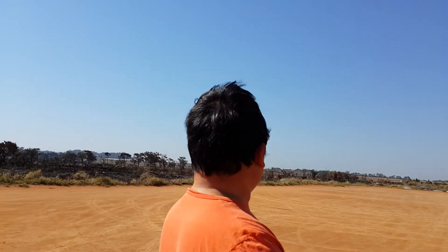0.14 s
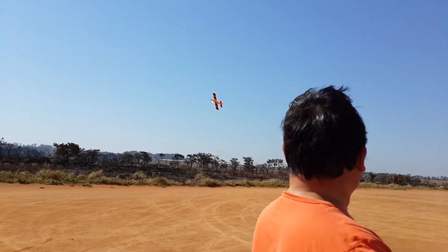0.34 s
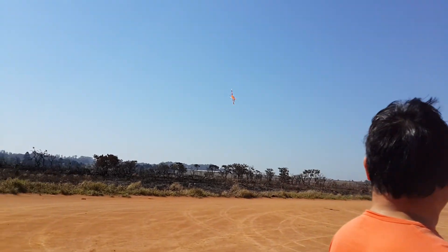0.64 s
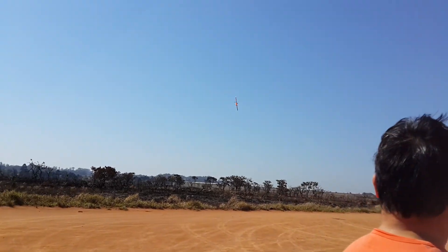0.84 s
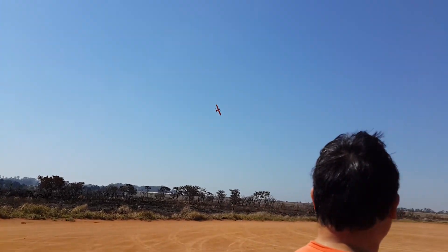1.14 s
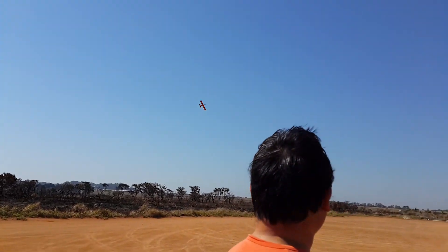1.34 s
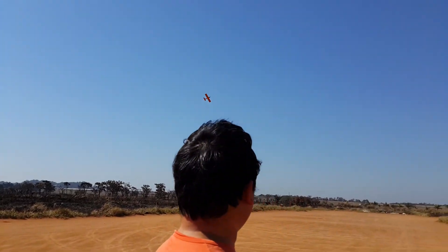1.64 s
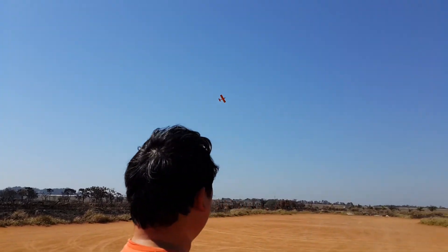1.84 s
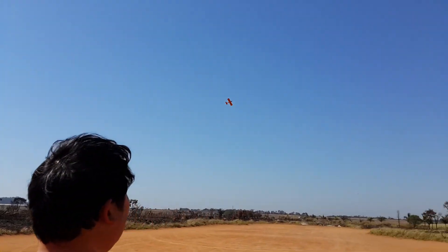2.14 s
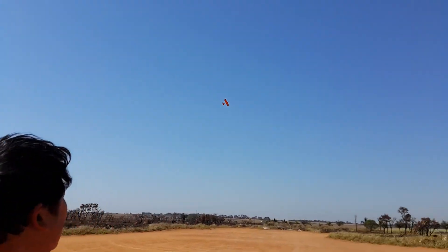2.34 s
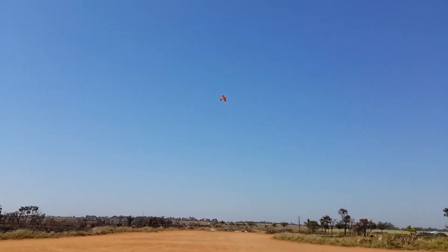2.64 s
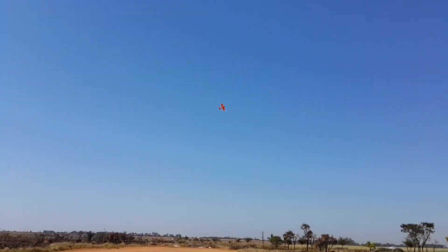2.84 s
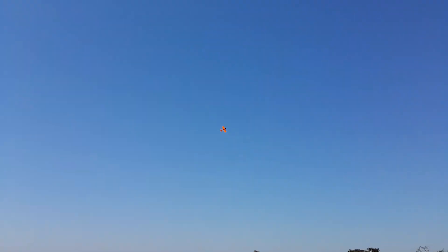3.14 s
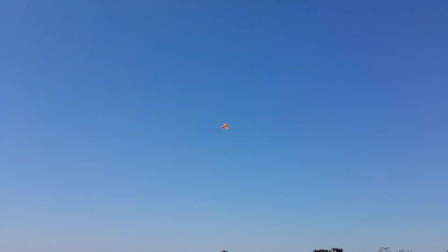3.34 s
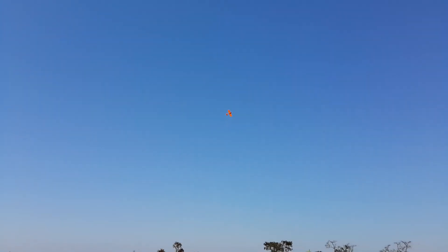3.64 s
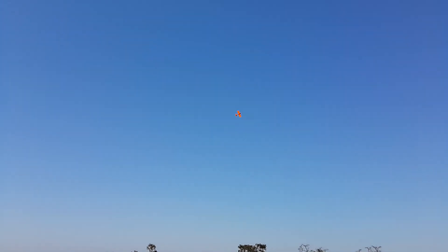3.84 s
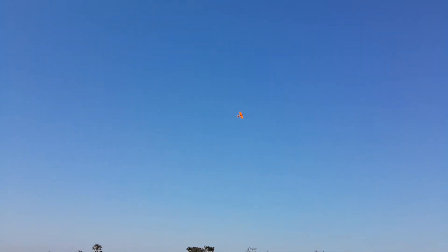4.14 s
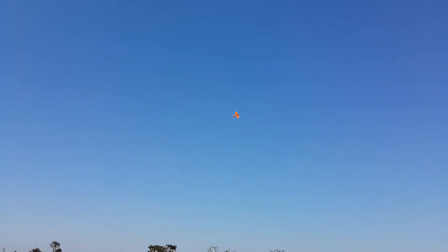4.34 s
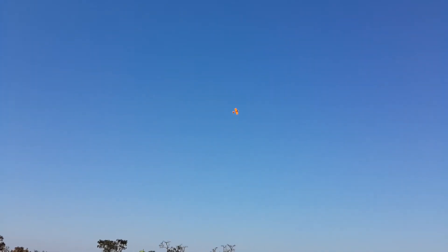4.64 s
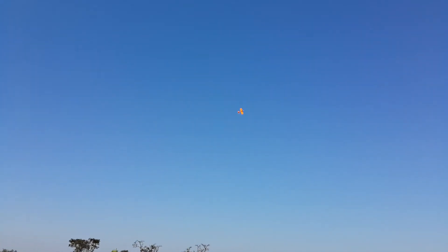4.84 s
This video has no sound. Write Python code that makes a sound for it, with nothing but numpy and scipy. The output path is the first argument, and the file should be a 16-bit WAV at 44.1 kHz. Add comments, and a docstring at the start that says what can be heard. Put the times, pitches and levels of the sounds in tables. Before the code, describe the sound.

Outdoors on a bare open field, a small electric model aeroplane turns away and climbs. Its airy propeller hiss and piercing high whine are strongest in the first second, then thin to a faint buzzing hum. Loud wind rumble and sharp thumps hit the stereo microphone throughout, heaviest on the left early on.

```python
"""Over a bare field, a small electric model aeroplane turns away and climbs, heard by two microphone ports.
The propeller is blade-chopped noise; the motor hums in sines at multiples of the shaft speed.
The speed controller whines in a switching tone with side tones. The ground adds a delayed echo to hiss and hum.
Wind is lumpy low noise, separate at each port, with sharp buffets on top."""
import sys
import numpy as np
from scipy import signal
from scipy.fft import rfft, irfft
from scipy.io import wavfile
from scipy.ndimage import uniform_filter1d

SR = 44100
rng = np.random.default_rng(int(sys.argv[2]) if len(sys.argv) > 2 else 0)


def materialize(psi):
    """Save the field psi as 16-bit PCM at rate SR to the path in sys.argv[1].

    A 1-D psi becomes a single channel; in a 2-D psi each row is a channel.
    """
    bounded = np.clip(np.atleast_2d(psi).T, -1, 1)
    quanta = np.round(bounded * 32767).astype(np.int16)
    wavfile.write(sys.argv[1], SR, quanta)


N = 220852
T = np.arange(N) / SR

# propeller hiss: (time [s], hiss level before colouring [dB], five airframe buzz bands [dB], treble [dB]);
# for buzz and treble only the movement about each column's mean is heard
PROPELLER_HISS = [(0.0, -43.5, 6, -2, -7, -5, 0, -2), (0.03, -33, -9, -13, -14, -10.5, -7, -10),
                  (0.17, -39, -2, -2.5, -7.5, -7.5, -9, -6.5), (0.56, -34.5, -7, -5, -6.5, -11.5, -5, -6),
                  (0.63, -37, -9, -3.5, -4.5, -4, -5, -4.5), (0.96, -37.5, -17.5, -4, -8.5, 0, -2.5, -8.5),
                  (1.04, -40, -12, -4, -2.5, -3, 0, -7), (1.09, -43, -4, -6, -8, -4, -3.5, -7.5),
                  (1.27, -41.5, -13, -6.5, -8, -9, -7, -7.5), (1.57, -40, -14, -13, -12, -13.5, -10, -4),
                  (1.66, -38.5, -13, -6, -10, -17, -11, -6), (1.73, -42, -7, -2, -2.5, -5, -8.5, -6.5),
                  (2.01, -40, -7.5, -5.5, -12, -4, -6, -8), (2.36, -41, -9.5, -1, -8.5, -4.5, -8, -9),
                  (2.59, -39, -11.5, -5, -10.5, -8, -8, -10), (2.73, -40, -4.5, -3, -8, -12, -16, -14.5),
                  (2.87, -41.5, -10, 1, -7.5, -6, -7.5, -5), (2.98, -39.5, -14, -4.5, -15, -10, -13, -10.5),
                  (3.26, -41, -10, -5, -13, -9, -8, -9.5), (3.42, -40.5, -11, -6, -14, -9, -9.5, -14),
                  (3.54, -37.5, -13.5, -6.5, -10.5, -11, -11, -13.5),
                  (3.77, -41.5, -11, -8.5, -11, -4.5, -5.5, -11.5),
                  (3.92, -41, -12, 1, -8.5, -5.5, -3.5, -4.5),
                  (4.09, -41, -9.5, -2.5, -8.5, -7, -7.5, -11.5),
                  (4.52, -42, -12, -1.5, -11, -10, -4.5, -10), (4.71, -40.5, -12, 1, -13, -8, -5, -7.5),
                  (5.01, -44, -4, -4.5, -6, -7, -6.5, -10.5)]
# the whine fades in and out through uneven air: (time [s], level [dB])
WHINE_FADES = [(0.0, -41), (0.04, -36.5), (0.08, -47), (0.14, -32.5), (0.18, -52), (0.26, -33.5),
               (0.32, -39), (0.35, -55), (0.46, -33), (0.47, -43), (0.57, -25.5), (0.6, -34.5),
               (0.67, -28.5), (0.74, -41), (0.88, -32), (1.05, -34.5), (1.07, -43), (1.27, -54),
               (1.46, -52), (1.57, -54), (1.8, -45), (1.87, -65), (2.04, -53), (2.12, -48), (2.3, -43),
               (2.58, -46.5), (2.61, -39), (2.7, -52.5), (2.84, -45.5), (3.08, -54.5), (3.15, -47),
               (3.32, -53.5), (3.6, -47), (4.35, -57.5), (4.48, -44), (4.85, -53.5), (5.01, -53)]


def gain_of(db):
    """Amplitude factor of a level in dB."""
    return 10 ** (np.asarray(db) / 20)


def evened(x):
    """Scale a signal to rms 1."""
    return x / np.sqrt(np.mean(x ** 2) + 1e-20)


def read(points, hz):
    """Read a frequency table, with straight lines over log frequency."""
    f, value = np.transpose(points)
    return np.interp(np.log(hz + 1), np.log(f + 1), value)


def curves(rows, t=T):
    """Draw every column of a time table as straight lines."""
    s, *columns = np.transpose(rows)
    return [np.interp(t, s, column) for column in columns]


def drift(rate_hz, count):
    """Slow random curves with a joint rms of 1: noise in 32-sample steps, rolled off above rate_hz."""
    steps = N // 32 + 2
    hz = np.fft.rfftfreq(steps, 32 / SR)
    spectrum = rfft(rng.standard_normal((count, steps))) / (1 + (hz / rate_hz) ** 4)
    slow = evened(irfft(spectrum, steps))
    return np.array([np.interp(np.arange(N) / 32, np.arange(steps), s) for s in slow])


def sides(pan_db):
    """Left and right gains; with unrelated ports their mean would have power 1."""
    left = gain_of(np.clip(pan_db, -40, 40))
    return 2 * np.array([left, np.ones_like(left)]) / np.sqrt(1 + left ** 2)


def tone(turns, db):
    """A sine of the given rms level, from its running phase in turns and a random start."""
    return np.sqrt(2) * gain_of(db) * np.cos(2 * np.pi * (turns + rng.random()))


def doppler():
    """Pitch heard over pitch sent: a receding source stretches its waves."""
    # the craft turns away, flies out and comes round: (time [s], speed away from the listener [m/s])
    receding = [(0, 2.85), (.07, 3.55), (.255, 8.1), (.41, 11.5), (.5, 12.9), (.83, 16.2), (.975, 16.7),
                (1.3, 17.1), (1.73, 15.8), (1.92, 15), (2.58, 10.5), (2.88, 8.4), (3.26, 4.8), (3.63, 3.2),
                (3.89, 3.8), (4.11, 2.85), (4.64, 2.1), (5.01, 0)]
    sound_m_per_s = 343
    return sound_m_per_s / (sound_m_per_s + curves(receding)[0])


def motor():
    """Shaft orders as wavering sines that swell and fade, plus the commutation tone."""
    # the throttle opens in two steps: (time [s], shaft speed [turns/s])
    shaft = [(0, 116), (.15, 118), (.3, 126.7), (.55, 129.5), (1.45, 127.8), (1.58, 129.9), (1.68, 139.7),
             (1.72, 142.6), (1.8, 144.2), (2.1, 144.6), (2.6, 144.3), (3.3, 145.9), (3.85, 145.3),
             (5.01, 145.4)]
    # steady hum before it follows the hiss: (multiple of the shaft speed, level [dB])
    orders = [(6, -65), (7, -58), (8, -63), (9, -57), (10, -70), (11, -58), (12, -61), (13, -55.5),
              (14, -66), (15, -60), (16, -65), (17, -65), (19, -63), (20, -62), (21, -67), (22, -62),
              (23, -70), (24, -65), (29, -70), (33, -68), (35, -72), (37, -72)]
    # an order swells and fades: (time of the top [s], multiple, half length to 9 dB down [s], level [dB])
    swells = [(0.033, 13, 0.065, -44), (0.58, 9, 0.12, -44), (0.57, 21, 0.14, -49), (0.64, 35, 0.15, -59),
              (0.67, 11, 0.18, -51), (0.63, 12, 0.38, -59), (0.9, 14, 0.24, -53), (1.8, 13, 0.3, -66),
              (1.4, 12, 1, -55), (1.8, 15, 0.07, -49), (2.23, 20, 0.72, -57), (2.54, 11, 0.091, -51),
              (2.82, 13, 0.28, -52.5), (2.6, 13, 0.17, -49), (0.88, 9, 0.13, -47), (3.02, 7, 0.18, -54),
              (3.003, 15, 0.32, -61), (3.39, 9, 0.098, -52), (3.75, 29, 0.27, -56.5), (4.02, 15, 0.22, -53),
              (3.58, 15, .25, -57), (4.47, 13, 0.3, -66), (1.85, 10, 0.23, -52), (3.3, 17, .35, -58),
              (3.2, 16, 0.68, -59), (2.1, 9, 0.59, -55.5), (3.67, 20, 0.25, -58.5), (2.06, 24, 0.15, -53),
              (2.63, 7, 0.27, -49), (1.66, 12, 0.064, -51), (1.63, 13, 0.053, -66), (2.14, 11, 0.23, -55),
              (2.8, 22, 0.45, -62), (2.2, 17, .45, -56), (3.8, 22, 0.2, -57.5), (4.04, 8, 0.58, -52),
              (3.92, 11, 0.069, -57.5), (4.912, 6, 0.16, -51)]
    # commutation tone before its waver: (time [s], level [dB])
    commutation_level = [(0, -62), (.9, -55), (1.5, -68), (1.66, -45), (1.75, -58), (1.82, -52),
                         (2.15, -51), (2.25, -57), (2.6, -56), (2.8, -66), (5.01, -68)]
    # the hum sinks into the hiss while the shaft first speeds up: (time [s], level [dB])
    spool_level = [(0, -2), (.12, -9), (.33, -9), (.45, 0), (5.01, 0)]
    commutation_order = 42
    jitter_turns, jitter_hz = .0045, 12  # rms unsteadiness of the shaft
    waver_db, flutter_db = 1.2, 1.1  # slow and quick unsteadiness of each order, rms

    turns = np.cumsum(curves(shaft)[0] * doppler()) / SR
    turns = turns + jitter_turns * drift(jitter_hz, count=1)[0]
    # the steady hum rises and falls with the hiss
    steady = gain_of(1.5 * (curves(PROPELLER_HISS)[0] + 39.5) + curves(spool_level)[0])
    wavers = waver_db * drift(0.95, count=len(orders)) + flutter_db * drift(35, count=len(orders))
    hum = tone(commutation_order * turns, curves(commutation_level)[0] + wavers[0])
    for (order, db), waver in zip(orders, wavers):
        beam = sum(gain_of(top_db - db - 9 * ((T - s) / half) ** 2)
                   for s, swelling, half, top_db in swells if swelling == order)
        hum += tone(order * turns, db + waver) * (steady + beam)
    return turns, hum


def whine(turns):
    """The controller's switching tone, with side tones spaced by shaft turns and blurred bands beside it."""
    # side tones before their swell: (shaft multiples above or below the whine, level [dB])
    sidebands = [(-2, -60), (-1, -57), (1, -55), (2, -57), (4, -59)]
    # common swell of the side tones: (time [s], level [dB])
    sideband_swell = [(0, -8), (.5, 3), (1, 1), (1.2, -6), (1.45, 0), (1.7, -7), (2.2, -12), (5.01, -18)]
    # pair at whine less and plus 14 shaft turns, before port gains: (time [s], level [dB])
    pole_band = [(0, -49), (.2, -51), (.3, -68), (.4, -80), (5.01, -80)]
    # balance of the main tone before it wanders: (time [s], left minus right [dB])
    whine_pan = [(0, -25), (.9, -14), (1.5, -30), (1.9, -21), (2.4, -18), (3, -9), (3.8, -25), (4.1, -19),
                 (5.01, -13)]
    # blurred bands: (distance from the whine [Hz], level added to the fuzz [dB])
    fuzz = [(-430, -7), (288.5, -7), (806.5, -10.5)]
    # common fuzz before port gains: (time [s], level [dB])
    fuzz_level = [(0, -78), (2.1, -68), (2.5, -61), (3.1, -59), (3.9, -52), (4.3, -61), (4.6, -54),
                  (5.01, -59)]
    switching_hz = 8000
    blur_turns, blur_hz, fuzz_waver_db = .2, 90, 4
    pan_wander_db, pan_wander_hz = 3.5, 2.7

    flutter = drift(42, count=5)
    cycles = np.cumsum(switching_hz * doppler()) / SR + 0.0085 * flutter[0]

    side = sum(tone(cycles + order * turns, db) for order, db in sidebands)
    side = side * gain_of(curves(sideband_swell)[0])

    pole_db = curves(pole_band)[0]
    pole = tone(cycles - 14 * turns, pole_db)
    pole = pole + tone(cycles + 14 * turns, pole_db) * gain_of([[-20], [-4]])  # left, right

    blurs = blur_turns * drift(blur_hz, count=len(fuzz))
    wavers = fuzz_waver_db * drift(18, count=len(fuzz))
    fuzz_db = curves(fuzz_level)[0]
    side = side + sum(tone(cycles + hz * T + blur, fuzz_db + db + waver)
                      for (hz, db), blur, waver in zip(fuzz, blurs, wavers))

    ports = sides(curves(whine_pan)[0] + pan_wander_db * drift(pan_wander_hz, count=1)[0])
    # each port has its own flutter of phase and level
    main = tone(cycles + 0.027 * flutter[3:], curves(WHINE_FADES)[0] + 1.3 * flutter[1:3]) * ports
    return main + side * gain_of([[-9], [5]]) + pole


def flight(turns, hum):
    """Blade-chopped hiss and hum travel through uneven air, bounce off the ground and reach both ports."""
    # bands of the airframe buzz: (centre [Hz], half width [Hz])
    buzz_bands = [(1150, 280), (1700, 330), (2350, 380), (3050, 400), (4500, 800)]
    # likeness of the hiss at the two ports: (frequency [Hz], left-right likeness [0-1])
    alike_points = [(800, .95), (3000, .75), (6000, .7), (10000, .35)]
    # a bright band swells while the craft banks away: (time [s], level [dB])
    sizzle_swell = [(.55, 2.5), (.75, 6), (1.03, 6.5), (1.14, 2.5)]
    # climbing lengthens the echo: (time [s], delay [ms])
    ground_delay = [(0, 1.48), (.28, 1.65), (.48, 1.77), (.68, 1.95), (.88, 2.085), (1.28, 2.285),
                    (1.68, 2.36), (1.88, 2.405), (2.28, 2.46), (2.68, 2.6), (3.08, 2.84), (3.48, 3.05),
                    (3.88, 3.155), (4.28, 3.175), (4.48, 3.23), (5.01, 3.24)]
    # what the ground returns: (frequency [Hz], echo size [share of the direct sound])
    ground_share = [(500, .55), (3000, .62), (5000, .45), (9000, .12)]
    # colour of the left port: (frequency [Hz], level [dB])
    left_colour = [(300, 7.5), (800, -1.5), (1400, -3), (1750, 3), (2500, -4), (3000, 2), (3600, -7.5),
                   (4500, -2), (5500, -10), (6800, -10), (8500, -8), (9500, -18.5), (11000, -56),
                   (12000, -16.5), (12800, -44), (14400, -27)]
    # colour of the right port: (frequency [Hz], level [dB])
    right_colour = [(300, -25), (800, -3), (1400, -6), (1750, -2.5), (2200, -6.5), (3000, -3), (3500, -10),
                    (4400, 2), (5600, -8), (6300, -5), (8500, -0.5), (10000, -7), (12200, -13.5),
                    (12800, -22.5), (14400, -29)]
    treble_follows = 0.17  # share of the whine's quick fades that the treble hiss takes on
    buzz_wander_db, buzz_wander_hz = 0.96, 5.3  # random wander of each band
    sizzle_hz, sizzle_width_hz = 6500, 1200
    left_lag_s = 2 / SR  # left port hears later

    # chopping at twice the shaft speed, and more weakly at once
    chop = 1 + 0.12 * np.cos(4 * np.pi * turns) + 0.059 * np.cos(2 * np.pi * turns)
    hiss = rng.standard_normal((2, N)) * chop
    hz, t, z = signal.stft(np.vstack([hiss, hum]), SR, nperseg=1024, noverlap=896)
    hz_rows = hz[:, None]

    level_db, *buzz_db, treble_db = curves(PROPELLER_HISS, t)
    whine_db = curves(WHINE_FADES, t)[0]
    treble_db = treble_db + treble_follows * (whine_db - uniform_filter1d(whine_db, size=170))
    bright = np.clip(np.log2(hz / 4600 + 1e-9) / 0.21, 0, 1)[:, None]

    alike = np.clip(read(alike_points, hz), 0, 1)[:, None]
    noise = np.array([z[0], alike * z[0] + np.sqrt(1 - alike ** 2) * z[1]])

    patches = rng.standard_normal(z[0].shape)
    patches = evened(uniform_filter1d(uniform_filter1d(patches, 24, 0), 20, 1))
    # air pockets make the whole treble flicker together
    flicker = evened(uniform_filter1d(rng.standard_normal(len(t)), 11))

    frames = np.minimum(t * SR, N - 1).astype(int)
    wanders = drift(buzz_wander_hz, count=len(buzz_bands))[:, frames]
    buzz = sum(np.exp(-((hz_rows - centre) / width) ** 2) * (db - db.mean() + buzz_wander_db * wander)
               for (centre, width), db, wander in zip(buzz_bands, buzz_db, wanders))
    # the top of the hiss is bright at first, then drops suddenly just after 1 s
    top = np.clip((hz_rows - 8000) / 5000, 0, 1) * np.interp(t, [1.03, 1.1], [9, -2])
    sizzle = np.exp(-((hz_rows - sizzle_hz) / sizzle_width_hz) ** 2) * curves(sizzle_swell, t)[0]

    field_db = level_db + 8.5 + sizzle + top + buzz + patches
    field_db = field_db + bright * (treble_db - treble_db.mean() + 1.38 * flicker)

    delay_s = curves(ground_delay, t)[0] / 1000
    echo = 1 + read(ground_share, hz)[:, None] * np.exp(-2j * np.pi * hz_rows * delay_s)
    ports = gain_of([read(left_colour, hz), read(right_colour, hz)])
    ports = ports * np.exp(-2j * np.pi * hz * [[left_lag_s], [0]])
    heard = (noise * gain_of(field_db) + z[2]) * echo * ports[:, :, None]
    return signal.istft(heard, SR, nperseg=1024, noverlap=896)[1][:, :N]


def wind():
    """Lumpy low noise and eddy pulses, unrelated between ports; each lump is louder and brighter than the lull."""
    # steady wind at each port: (time [s], left level [dB], right level [dB])
    gusts = [(0.0, -21, -19), (0.25, -23.5, -32), (0.4, -10.5, -32.5), (0.7, -14, -40), (1.1, -10.5, -43),
             (1.25, -18, -25), (1.6, -36, -24.5), (2.0, -22, -28.5), (2.5, -36.5, -23), (3.0, -32.5, -26.5),
             (3.4, -35.5, -24.5), (3.6, -41, -27.5), (3.68, -36, -38.5), (3.76, -37, -34),
             (3.95, -21.5, -50.5), (4.3, -23.5, -24), (4.6, -20, -30), (5.0, -15.5, -37)]
    # short surges on one port: (time of the top [s], port [0 left, 1 right], level [dB], half length [s])
    puffs = [(0.109, 1, -13.5, 0.032), (0.284, 1, -19, 0.037), (0.449, 0, -7.5, 0.039),
             (0.452, 1, -30, 0.025), (0.627, 1, -26, 0.045), (1.204, 1, -14.5, 0.015),
             (1.259, 0, -10, 0.009), (1.393, 1, -14, 0.018), (1.462, 0, -21.5, 0.038),
             (1.509, 1, -14.5, 0.036), (1.575, 0, -21.5, 0.04), (1.62, 1, -15.5, 0.052),
             (1.749, 0, -17.5, 0.012), (1.799, 1, -20.5, 0.089), (1.89, 0, -15.5, 0.044),
             (2.005, 1, -17, 0.033), (2.014, 0, -17, 0.03), (2.155, 1, -16.5, 0.035),
             (2.25, 0, -21.5, 0.068), (2.374, 0, -26, 0.042), (2.831, 0, -20, 0.013),
             (2.936, 1, -21, 0.019), (3.175, 0, -16, 0.012), (3.275, 1, -21, 0.028), (3.394, 0, -28, 0.046),
             (3.643, 0, -20, 0.02), (3.755, 0, -25, 0.055), (3.82, 1, -29.5, 0.11),
             (3.902, 0, -15.5, 0.041), (4.072, 0, -19.5, 0.077), (4.287, 0, -16, 0.018),
             (4.316, 1, -19, 0.061), (4.557, 0, -15.5, 0.021), (4.579, 1, -16.5, 0.019),
             (4.682, 1, -21.5, 0.046)]
    # relative spectrum of the left wind: (frequency [Hz], density [dB per Hz])
    left_spectrum = [(12, -50), (25, -31), (40, -14), (60, -4.5), (90, 0.5), (150, 3), (280, -1),
                     (400, -10.5), (550, -16), (750, -24.5), (1200, -39), (2500, -100)]
    # relative spectrum of the right wind: (frequency [Hz], density [dB per Hz])
    right_spectrum = [(12, -50), (25, -40), (40, -16), (60, -8), (90, -5), (130, -0.5), (200, 1),
                      (280, -2.5), (400, -5.5), (550, -14), (750, -21.5), (1200, -40.5), (2500, -86)]
    pulses_per_s, pulse_spread_db, pulse_share = 110, 2.5, 0.66  # eddies bursting on a port
    surge_rms_db, surge_hz = 1.5, 9  # lesser surges and lulls come at random

    when, size = rng.random((2, N)), rng.exponential(size=(2, N))
    hiss = rng.standard_normal((2, N))
    bursts = when < pulses_per_s / SR
    pulses = evened(bursts * np.sign(hiss) * gain_of(pulse_spread_db * np.minimum(size, 3)))
    rough = pulse_share * pulses + np.sqrt(1 - pulse_share ** 2) * hiss[::-1]

    hz = np.fft.rfftfreq(N, 1 / SR)
    colour = rfft(rough) * gain_of([read(left_spectrum, hz), read(right_spectrum, hz)])
    tilt = np.clip(np.log2(hz / 110 + 1e-9) / 1.9, 0, 1)  # crossover from low to high part
    low, high = irfft(colour * (1 - tilt), N), irfft(colour * tilt, N)

    lumps = np.clip(drift(61.0, count=2), -3, 1.5)
    steady = gain_of(curves(gusts))
    gust = steady * gain_of(surge_rms_db * drift(surge_hz, count=2))
    for s, port, db, half in puffs:
        gust[port] = np.maximum(gust[port], gain_of(db - 12.2 * ((T - s) / half) ** 2))
    surge_db = 20 * np.log10(gust / steady)  # a surge is brighter
    blown = low * gain_of(1.9 * lumps) + high * gain_of(3.0 * lumps + 0.16 * surge_db) * 0.94
    return np.array([evened(port) for port in blown]) * gust


def knocks():
    """A sharp buffet is a couple of pressure cycles, mostly on one port, falling in pitch after its top."""
    # buffets: (time 0.6 cycles before the top [s], level before panning [dB], pitch at the top [Hz],
    # left minus right [dB], held within 40 dB)
    buffets = [(0.191, -18, 454, -22), (0.333, -9, 413, 23), (0.368, -10, 480, 24.5), (0.43, -13, 560, 31),
               (0.546, -6.5, 352, 27), (0.684, -8.5, 383, 32), (0.84, -8.5, 480, 42),
               (1.147, -14.5, 358, -4), (1.236, -10, 265, 24), (1.254, -13.5, 430, 30),
               (1.501, -13.5, 475, -34), (1.626, -15, 403, -32), (1.775, -18, 545, -32),
               (1.795, -15, 398, -30), (1.947, -19, 368, -6), (1.978, -15.5, 397, -27),
               (3.638, -20.5, 263, 18), (3.889, -11.5, 220, 23), (3.952, -12.5, 247, 20),
               (3.996, -16, 148, 38), (4.078, -10.5, 228, 35), (4.324, -16.5, 460, -35),
               (4.363, -13, 428, -11), (4.415, -22, 353, -25), (4.464, -22, 350, -29),
               (4.568, -14, 606, -24)]
    out = np.zeros((2, N))
    for s, db, hz, pan_db in buffets:
        u = (T - s) * hz - .6  # cycles from the top
        envelope = np.exp(-(u / np.where(u < 0, .4, 1.3)) ** 2)
        pressure = np.cos(2 * np.pi * (u - 0.25 * u * abs(u) + rng.random()))
        out += gain_of(db) * sides(np.array([pan_db])) * envelope * pressure
    return out


def scene():
    """The aeroplane's sounds and the wind, summed at both ports."""
    turns, hum = motor()
    return flight(turns, hum) + whine(turns) + wind() + knocks()


def record(dry):
    """The input stage rounds off the hardest gusts and blocks the deepest bass; then the band limit."""
    edge_hz = 14440
    rounded = .95 * np.tanh(dry / .95)
    soft = signal.sosfilt(signal.butter(2, 35, "high", fs=SR, output="sos"), rounded)
    band_limit = signal.firwin(511, edge_hz, window=("kaiser", 9), fs=SR)
    return signal.oaconvolve(soft, band_limit[None], "same")


dry = scene()
out = record(dry)
materialize(out)
```